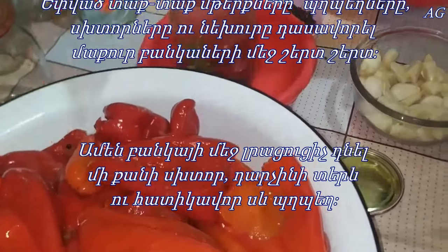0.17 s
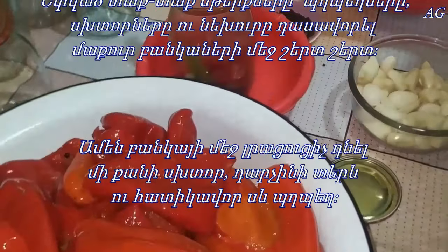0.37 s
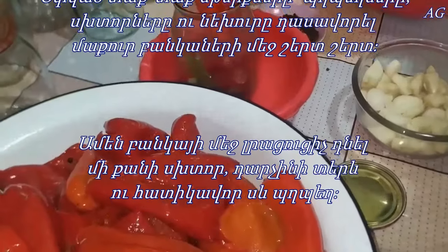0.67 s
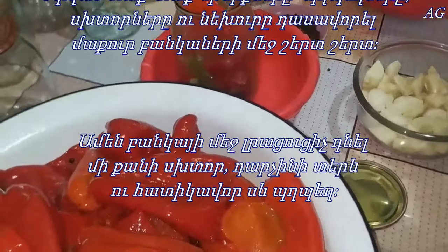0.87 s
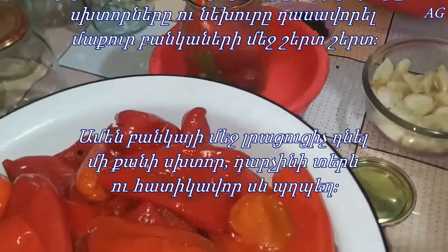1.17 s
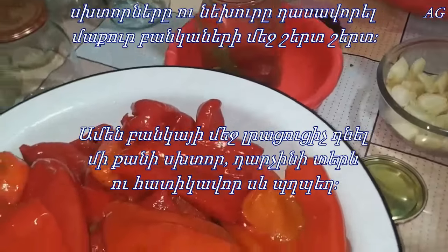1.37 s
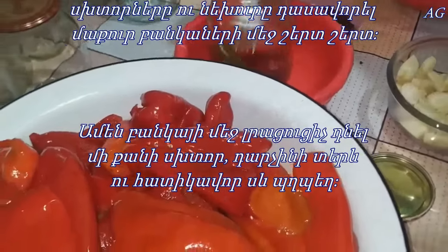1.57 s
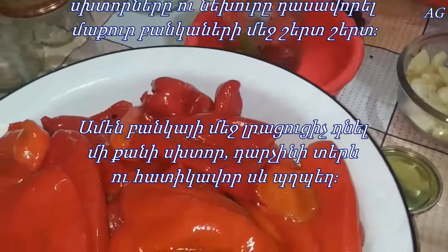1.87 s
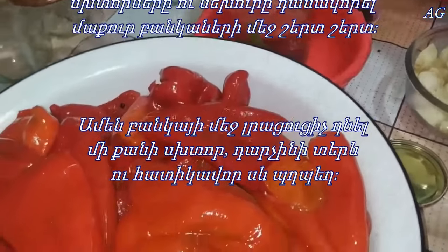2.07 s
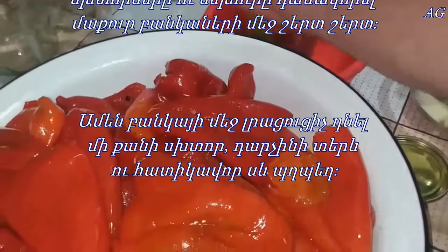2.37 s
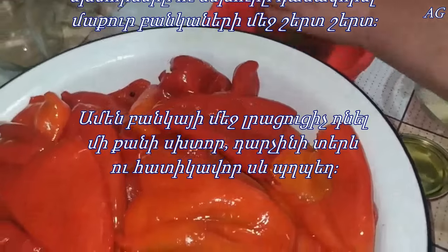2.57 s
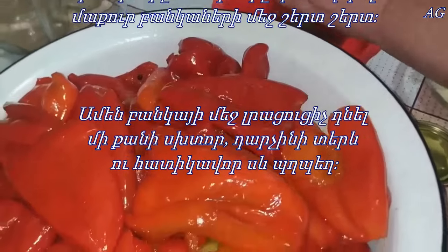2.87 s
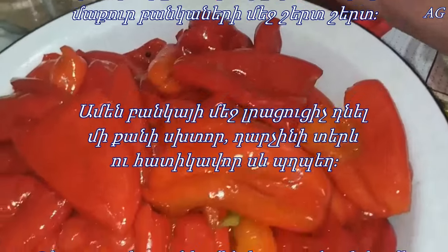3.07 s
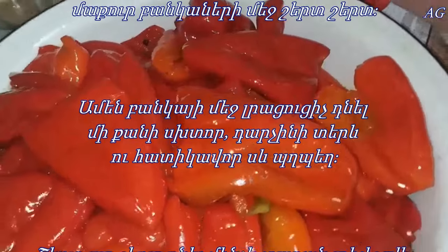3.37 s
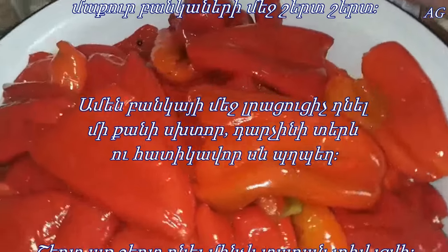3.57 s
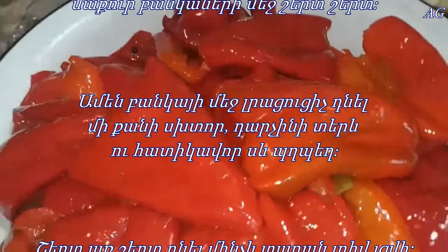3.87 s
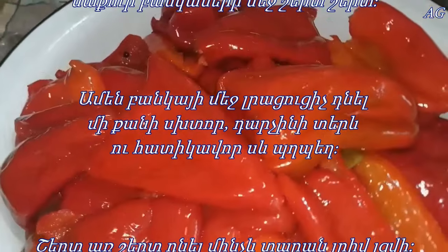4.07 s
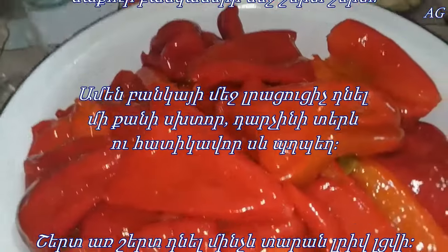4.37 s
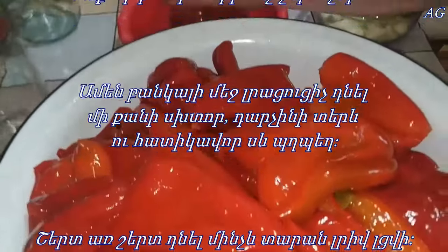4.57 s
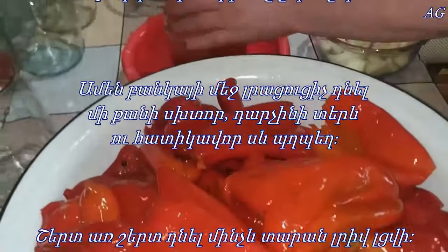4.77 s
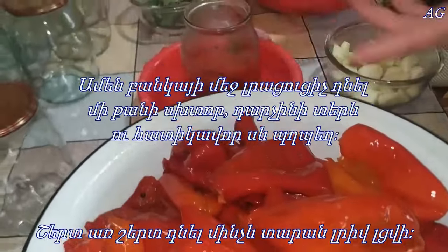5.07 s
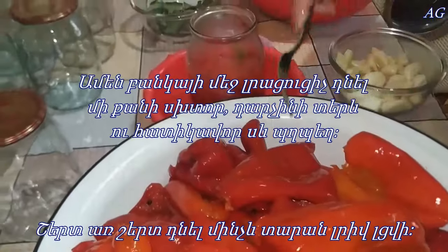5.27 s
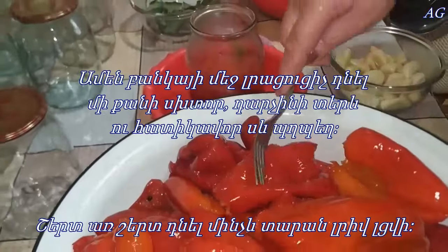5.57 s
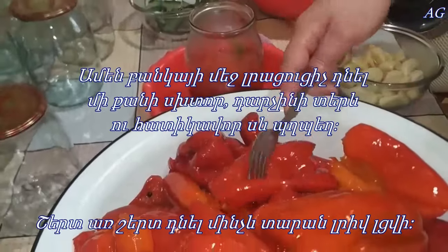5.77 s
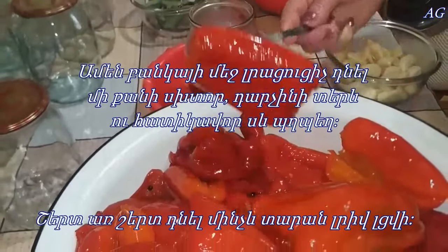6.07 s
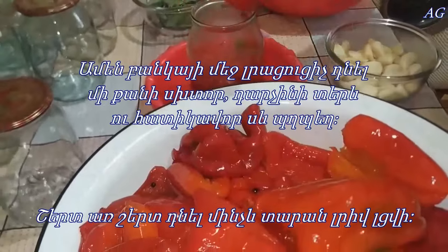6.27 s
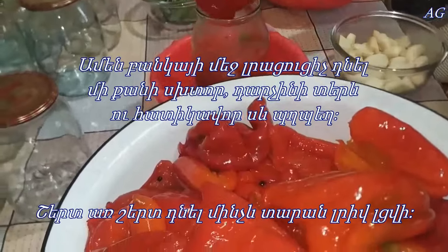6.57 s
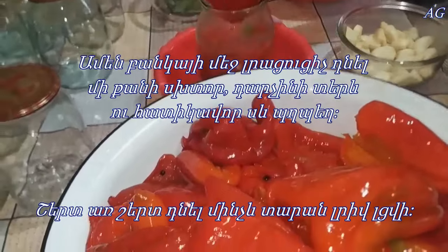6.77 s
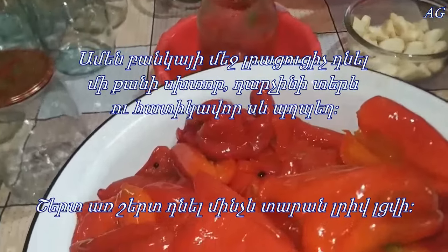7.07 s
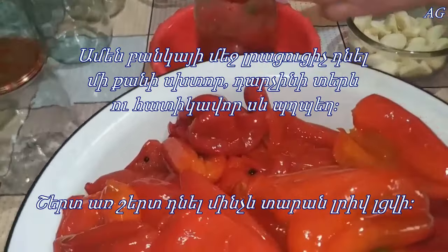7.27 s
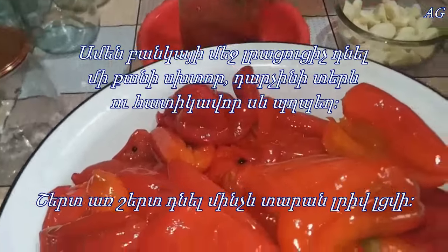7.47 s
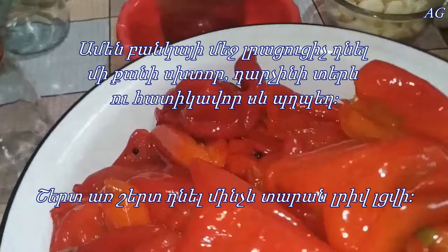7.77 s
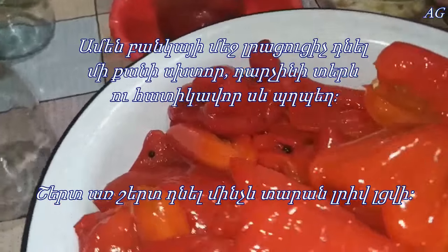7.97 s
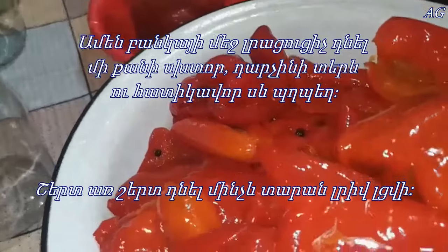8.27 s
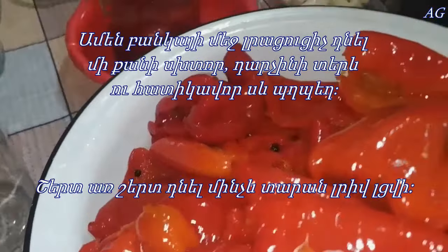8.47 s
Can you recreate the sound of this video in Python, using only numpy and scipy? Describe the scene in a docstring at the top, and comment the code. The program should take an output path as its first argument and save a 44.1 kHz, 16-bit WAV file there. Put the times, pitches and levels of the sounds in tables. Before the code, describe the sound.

Glassware clinks brightly at close range while wet food is nudged and hands rustle, over a faint low rumble and hum in a small kitchen.

```python
"""A faint low rumble and hum come first, with hands and sleeves rustling over them as filtered noise.
Then wet food is nudged about in dull puffs of noise, and glassware clinks eleven times, close by:
red peppers and garlic are being packed into a glass jar on a kitchen table.
Each clink is a sum of glass modes damped by the load, plus a noise crack, ringing on in a small room."""
import sys
import numpy as np
from scipy import signal
from scipy.fft import rfft, irfft
from scipy.io import wavfile
from scipy.ndimage import uniform_filter1d

SR = 44100
rng = np.random.default_rng(int(sys.argv[2]) if len(sys.argv) > 2 else 0)


def generate_wav(signal):
    """Clip the signal to [-1, 1] and save it as 16-bit WAV at the path in sys.argv[1]."""
    frames = np.transpose(np.atleast_2d(signal))
    scaled = np.clip(frames, -1, 1) * 32767
    pcm = np.round(scaled).astype(np.int16)
    wavfile.write(sys.argv[1], SR, pcm)


N = 381024  # length in samples


def gain_of(db):
    """Decibels to gain."""
    return 10 ** (np.asarray(db) / 20)


def evened(x):
    """Scales to rms 1."""
    return x / np.sqrt(np.mean(x ** 2) + 1e-20)


def read(points, hz):
    """Reads a curve on a log-frequency axis."""
    f, value = np.transpose(points)
    return np.interp(np.log(hz + 1), np.log(f + 1), value)


def follow(rows):
    """Draws every column of a timed table as a curve with a value at each sample."""
    s, *columns = np.transpose(rows)
    t = np.arange(N) / SR
    return [np.interp(t, s, column) for column in columns]


def smoothed_noise(first, second):
    """Random drift at rms 1: noise averaged twice, over these numbers of samples."""
    drift = uniform_filter1d(rng.standard_normal(N), first)
    return evened(uniform_filter1d(drift, second))


def add(mix, s, sound):
    """Mixes a stereo sound in at s seconds, cut off at the end of the mix."""
    start = max(round(s * SR), 0)
    part = mix[:, start:][:, :sound.shape[1]]
    part += sound[:, :part.shape[1]]


def panned(db):
    """Left and right gains for a left-over-right level difference, at constant power."""
    left, right = gain_of(db / 2), gain_of(-db / 2)
    return np.sqrt(2) * np.array([[left], [right]]) / np.hypot(left, right)


def coloured(x, spectrum):
    """Filters x with a spectrum, then scales it to rms 1."""
    size = x.shape[-1]
    hz = np.fft.rfftfreq(size, 1 / SR)
    return evened(irfft(rfft(x) * gain_of(read(spectrum, hz)), size))


def stereo_noise(size, shared):
    """Noise at two microphones; shared is the part of its power common to both."""
    z = rng.standard_normal((3, size))
    return np.sqrt(shared) * z[0] + np.sqrt(1 - shared) * z[1:]


def patchy(x, depth_db, frames, bins, size=512):
    """Lets patches of time and pitch swell and fade, by smoothed random gains on the spectrogram."""
    z = signal.stft(x, nperseg=size)[2]
    patches = uniform_filter1d(rng.standard_normal(z.shape[1:]), frames, axis=1)
    patches = evened(uniform_filter1d(patches, bins, axis=0))
    return signal.istft(z * gain_of(depth_db * patches), nperseg=size)[1][:, :N]


# Rumble of the room and the held camera, before the rumble trim: t/s, level/dB
RUMBLE_LEVEL = [(0, -62.5), (.7, -66), (.83, -57.5), (1.05, -62.5), (1.45, -55.5), (1.9, -61), (3.3, -57),
                (4.8, -59.5), (5.7, -61.5), (6.2, -59), (6.8, -61.5), (8.64, -58)]
# Tone colour of the rumble: f/Hz, relative level/dB
RUMBLE_COLOUR = [(10, -3.5), (30, 1.5), (60, -4), (110, -5), (160, -11.5), (240, -22), (400, -26),
                 (800, -37.5)]


def rumble(trim_db=3.5, lumps_db=2.5, sway_db=0.95):
    """Low filtered noise, lumpy in time and pitch, whose level also sways at random."""
    lumpy = patchy(stereo_noise(N, .03), lumps_db, 4, 2, size=4096)
    level_db = follow(RUMBLE_LEVEL)[0] + trim_db + sway_db * smoothed_noise(3000, 3000)
    return gain_of(level_db) * coloured(lumpy, RUMBLE_COLOUR)


# Partials of the steady hum: f/Hz, rms level/dB
HUM_PARTIALS = [(100, -67), (200, -87.5), (292, -83.5)]


def hum():
    """Steady sines, a quarter cycle apart between left and right."""
    t = np.arange(N) / SR
    side_cycles = np.array([[0], [.25]])
    out = np.zeros((2, N))
    for hz, db in HUM_PARTIALS:
        cycles = hz * t + rng.random() + side_cycles
        out += gain_of(db) * np.sqrt(2) * np.sin(2 * np.pi * cycles)
    return out


# A low drone that swells briefly: t/s, f/Hz, rms level of the fundamental/dB
DRONE_PATH = [(1.2, 131.5, -79), (1.31, 137.2, -60), (1.42, 136.6, -56.5), (1.5, 138.3, -62),
              (1.56, 149.8, -62), (1.64, 152, -57), (1.72, 141.6, -78)]


def drone(overtone_db=-17):
    """A gliding sine with a fainter octave above it, silent outside its path."""
    t = np.arange(N) / SR
    hz, db = follow(DRONE_PATH)
    phase = 2 * np.pi * np.cumsum(hz) / SR
    tone = np.sin(phase) + gain_of(overtone_db) * np.sin(2 * phase)
    sounding = (t > DRONE_PATH[0][0]) * (t < DRONE_PATH[-1][0])
    return np.sqrt(2) * gain_of(db) * tone * sounding


def background(side_db=-1.0):
    """Rumble, hum and drone add up as one bed, leaning slightly to the right."""
    return panned(side_db) * (rumble() + hum() + drone())


# Faint rustle that goes on between the strokes, before trims: t/s, level/dB
RUSTLE_LEVEL = [(0, -89), (1.03, -80), (1.2, -72.5), (2.4, -66), (3.4, -67.5), (4.8, -67), (5.45, -83),
                (5.7, -68), (6.6, -70), (7.3, -69.5), (8.64, -68.5)]
# Strokes of hand and sleeve, before trims:
# middle t/s, length t/s, dull body level/dB, bright friction level/dB
STROKES = [(.03, 0.11, -68, -73), (.37, 0.44, -73, -76), (0.623, 0.095, -65, -69.5), (0.887, .16, -64, -69),
           (1.34, 0.9, -68.5, -89), (1.67, 0.1, -57, -50.5), (1.836, 0.058, -78, -64),
           (2.436, 0.062, -51.5, -70), (2.525, 0.18, -51, -44), (2.752, 0.096, -50, -48.5),
           (2.972, 0.29, -63.5, -58), (3.068, 0.037, -43.5, -59), (3.18, 0.19, -48, -49),
           (3.473, 0.072, -50.5, -54.5), (3.553, 0.16, -57.5, -58), (3.76, 0.17, -53, -52),
           (3.887, 0.18, -48, -50.5), (4.068, .12, -48, -53), (4.333, 0.22, -51, -58.5),
           (4.453, 0.12, -66, -50.5), (4.653, 0.14, -56, -54), (5.02, 0.18, -80, -64),
           (5.265, .12, -65.5, -71), (5.445, .05, -65, -69), (5.582, 0.086, -64, -66),
           (5.802, 0.034, -65, -66), (5.96, 0.064, -69, -64), (6.419, 0.043, -65, -62),
           (6.741, 0.19, -63.5, -58.5), (6.94, 0.12, -62.5, -55.5), (7.17, 0.06, -75.5, -64),
           (7.385, .18, -58.5, -52.5), (7.489, 0.085, -59, -53.5), (7.786, 0.098, -60.5, -60),
           (7.9, 0.16, -65.5, -59.5), (8.06, 0.19, -64, -50.5), (8.284, 0.18, -63.5, -53.5)]
# Tone colour of the dull body: f/Hz, relative level/dB
BODY_COLOUR = [(90, -14), (200, 4), (400, 0), (700, -4), (1050, -1), (1600, -8.5), (3000, -15), (6000, -27)]
# Tone colour of the bright friction: f/Hz, relative level/dB
FRICTION_COLOUR = [(600, -22.5), (1500, -0.5), (2200, 1.5), (2900, -1), (3700, 1.5), (6000, -1), (7500, -3),
                   (9000, -5), (13000, -11), (15500, -15)]


def rubbing(trim_db=-3.5, catch_db=2.03, rustle_body_db=-0.5, edge_db=8.5, fidget_db=1.0):
    """Skin and cloth slide in tiny catches: a lumpy dull body under a smoother bright hiss."""
    t = np.arange(N) / SR
    rustle_db = follow(RUSTLE_LEVEL)[0] + fidget_db * smoothed_noise(2500, 2500)
    body_gain = gain_of(rustle_db + rustle_body_db)
    friction_gain = gain_of(rustle_db)
    for middle_s, length_s, dull_db, bright_db in STROKES:
        # the hand speeds up and slows down: half a length from its middle a stroke is edge_db down
        half_lengths = np.minimum(abs(t - middle_s) / (length_s / 2), 10)
        bell = gain_of(-edge_db * half_lengths ** 2)
        # strokes and rustle add in power
        body_gain = np.hypot(body_gain, gain_of(dull_db) * bell)
        friction_gain = np.hypot(friction_gain, gain_of(bright_db) * bell)
    catches = smoothed_noise(600, 300)
    dull = patchy(stereo_noise(N, .08), 3.2, 7, 3)
    bright = patchy(stereo_noise(N, .1), 2.0, 7, 8)
    dull = coloured(dull * gain_of(catch_db * catches), BODY_COLOUR)
    # the hiss follows the catches only slightly
    bright = coloured(bright * gain_of(0.18 * catch_db * catches), FRICTION_COLOUR)
    return gain_of(trim_db) * (body_gain * dull + friction_gain * bright)


# Soft touches of food and fork, levels before the envelope:
# t/s, level/dB, centre f/Hz, width/octaves, decay t/s
TOUCHES = [(.60, -69, 1050, 0.58, 0.031), (2.418, -48.5, 310, 0.71, 0.021),
           (2.501, -49.5, 980, 0.18, 0.041), (3.059, -50.5, 840, 0.68, 0.0086),
           (3.706, -55.5, 1290, 0.69, 0.032), (3.86, -47, 972, 0.98, 0.016), (3.995, -45, 816, 1, 0.0079),
           (4.41, -54, 1100, 1, 0.019), (5.564, -70, 1500, 0.86, 0.022), (5.667, -50.5, 7290, 0.76, 0.0064),
           (5.7, -59.5, 4560, 0.37, 0.012), (5.92, -68.5, 3830, 0.15, 0.022),
           (5.972, -64, 3800, 0.067, 0.021), (6.28, -59, 2320, 0.25, 0.01),
           (6.408, -64.5, 3200, 0.24, 0.031), (6.52, -66.5, 2500, 0.31, 0.035),
           (6.731, -62, 1320, 0.33, 0.037), (7.372, -49, 1420, 0.54, 0.012)]


def touches(rise_s=0.0023, tail_db=-13, tail_s=.06, size=12000):
    """Soft food gives dull puffs of noise without ring; the room holds each for a moment."""
    out = np.zeros((2, N))
    t = np.arange(size) / SR
    for s, db, hz, octaves, decay_s in TOUCHES:
        # a hill of noise around the centre, 4 dB down one width away
        hill = [(hz * 2 ** (k * octaves), -4 * k * k) for k in range(-3, 4)]
        fall = np.exp(-t / decay_s) + gain_of(tail_db) * np.exp(-t / tail_s)
        envelope = (1 - np.exp(-t / rise_s)) * fall
        puff = coloured(stereo_noise(size, 0.35), hill)
        add(out, s, gain_of(db) * envelope * puff)
    return out


# Ring time of the room, the time to fall 60 dB: f/Hz, t60/s
ROOM_T60 = [(300, .4), (900, .36), (2100, .28), (5500, .255), (9000, .235), (15000, .2)]


def kitchen(table_s=.0024, table_db=-1.5, early_db=1.0, early_s=.014, tail_db=0.5, size=20000):
    """Direct sound, a bounce off the table, scatter from nearby dishes and the tail of the room."""
    t = np.arange(size) / SR
    hz, frame_s, z = signal.stft(rng.standard_normal((2, size)), SR, nperseg=256)
    fade_db = -60 * frame_s / read(ROOM_T60, hz)[:, None]
    tail = signal.istft(z * gain_of(fade_db), SR, nperseg=256)[1][:, :size]
    tail *= np.clip((t - .005) / 0.0071, 0, 1)  # fades in from 5 ms
    sparse = rng.random((2, size)) < .05
    early = rng.standard_normal((2, size)) * sparse * np.exp(-t / early_s) * (t > .001)
    response = gain_of(tail_db) * evened(tail) + gain_of(early_db) * evened(early)
    response /= np.sqrt(size)
    response[:, 0] += 1  # direct sound
    # the bounce reaches each side at its own time
    bounce = np.round(table_s * SR * rng.uniform(.8, 1.2, 2)).astype(int)
    response[[0, 1], bounce] += gain_of(table_db)
    return response


# Borders between the families of glass modes; where a blow lands sets how strongly each sounds: f/Hz
FAMILY_EDGES = [200, 1500, 2900, 4600, 5900, 7600, 15800]
# Balance, one row a family, low to high:
# level trim/dB, contact crack level/dB before doubling, left-right level/dB
FAMILY_BALANCE = [(-1, 0, 1), (1.5, -17.5, 1.5), (-0.5, -9.5, -1), (-1.5, -11.5, 0), (-0.5, -11.5, -3.5),
                  (-2.5, -13, 2)]
# Modes of the glass, before random variation and each clink's factors: f/Hz, level/dB, t60/s
GLASS_MODES = [(1890, -11, .02), (2030, -4, .03), (2116, 0, .06), (2400, -24, .02), (2640, -25, .02),
               (3080, -17, .015), (3565, -10, .04), (4090, -11, .04), (4900, -19, .025), (5240, -7, .03),
               (5340, -5, .04), (5415, -6, .045), (6410, -4, .03), (6530, 0, .045), (6680, -12, .02),
               (7080, -16, .015), (7500, -18, .02), (8135, -11, .035), (8360, -19, .04), (9520, -15, .03),
               (9820, -13, .018), (10310, -18, .05), (10790, -12, .02), (11490, -11, .035),
               (12280, -15, .03), (12580, -11, .045), (13740, -15, .045), (13920, -16, .04),
               (14140, -16, .02), (14860, -17, .02)]


def ringing(t, lo, hi, ring_time, pitch, vary_db=4.5):
    """Modes of one family ring as decaying sines, retuned and damped by the load."""
    ring = 0
    for hz, mode_db, t60 in GLASS_MODES:
        if lo <= hz < hi:
            if hz < FAMILY_EDGES[2]:
                hz = hz * pitch  # only the two lowest families follow the pitch factor
            hz = hz * (1 + .002 * rng.standard_normal())
            fade_db = mode_db + vary_db * rng.standard_normal() - 60 * t / (t60 * ring_time)
            cycles = hz * t + rng.random((2, 1))  # its own phase at each microphone
            ring = ring + gain_of(fade_db) * np.sin(2 * np.pi * cycles)
    return ring


def contact_crack(t, crack_s=0.007, echo=0.5):
    """Decaying noise, hollowed at 4.4, 8.8 and 13.2 kHz by a very close reflection."""
    crack = rng.standard_normal((2, t.size)) * np.exp(-t / crack_s)
    return crack - echo * np.pad(crack, ((0, 0), (10, 0)))[:, :t.size]


def crack_band(crack, lo, hi, knock_hz=263):
    """The crack's share of one family; below the modes there is only a dull knock."""
    band = signal.sosfilt(signal.butter(2, [lo, hi], "band", fs=SR, output="sos"), crack)
    if lo < knock_hz:
        band = signal.sosfilt(signal.butter(1, knock_hz, fs=SR, output="sos"), band)
    return band


CONTACT_S, GRAZE_S = .001, .004  # build-up of the blow; lead of the light graze before it


def clink(levels, pan_db, ring_time, pitch, graze_db=-17, size=6000):
    """A light graze and then the blow ring the glass; the contact adds a short crack."""
    t = np.arange(size) / SR
    room, crack = kitchen(), contact_crack(t)
    loud = round(.08 * SR)  # a level is the rms of the first 80 ms
    build_up = (1 - np.exp(-t / CONTACT_S)) ** 2
    graze_samples = round(GRAZE_S * SR)
    out = 0
    families = zip(FAMILY_EDGES, FAMILY_EDGES[1:], levels, FAMILY_BALANCE)
    for lo, hi, db, (trim_db, crack_db, side_db) in families:
        ring = ringing(t, lo, hi, ring_time, pitch)
        blow = (ring + 2 * gain_of(crack_db) * crack_band(crack, lo, hi)) * build_up
        delayed = np.pad(blow, ((0, 0), (graze_samples, 0)))[:, :size]
        contact = gain_of(graze_db) * blow + delayed
        heard = signal.fftconvolve(contact, room, axes=1)
        heard /= heard[:, :loud].std(axis=1, keepdims=True)
        out = out + gain_of(db + trim_db) * panned(side_db + pan_db) * heard
    return out


# One row a clink: t/s, then level/dB of each of six families from low to high before the trim,
# left-right level/dB, ring time (factor), pitch of the two lowest families (factor)
CLINKS = [(0.745, -58, -47, -52.5, -48.5, -58, -55, 0.28, 1.35, 1.003),
          (1.403, -62, -62, -47.5, -60, -36, -42.5, 2.2, 1, 0.94),
          (1.976, -50, -25.5, -33, -24.5, -19, -27, -0.24, 0.65, 1.021),
          (2.247, -64.5, -52.5, -40.5, -51, -26.5, -35.5, 2, 1.03, 0.98),
          (2.573, -70, -45, -67, -53, -54.5, -54.5, -2, 0.26, 0.98),
          (3.219, -45, -22.5, -31, -29, -20, -28.5, 0.27, 0.97, 1.0),
          (3.508, -58.5, -39.5, -52.5, -38, -50.5, -48.5, 0.64, 0.49, 1.004),
          (4.184, -61.5, -40, -49, -52, -54, -52.5, 0.13, 0.52, 1.007),
          (4.661, -49.5, -30.5, -37.5, -34.5, -26, -35, 0.52, 0.51, 0.98),
          (7.663, -57.5, -46.5, -55.5, -48.5, -48, -49.5, 1, 0.37, 1.004),
          (8.154, -52, -33, -40.5, -25.5, -27.5, -35.5, -1.7, 0.49, 0.98)]


def glassware():
    """All the clinks, each begun early by the graze and the build-up of its blow."""
    out = np.zeros((2, N))
    for s, *levels, pan_db, ring_time, pitch in CLINKS:
        add(out, s - CONTACT_S - GRAZE_S, clink(levels, pan_db, ring_time, pitch))
    return out


def scene(hiss_db=-76.5):
    """Everything heard at the table, over the white hiss of the microphones."""
    hiss = gain_of(hiss_db) * rng.standard_normal((2, N))
    return hiss + background() + rubbing() + touches() + glassware()


def record(dry, ceiling=.9, top_hz=15900):
    """The camera rounds off the very tallest peaks and limits the treble."""
    rounded = dry / (1 + (dry / ceiling) ** 8) ** (1 / 8)
    lowpass = signal.firwin(255, top_hz, window=("kaiser", 8), fs=SR)
    return signal.oaconvolve(rounded, lowpass[None], "same")


dry = scene()
out = record(dry)
generate_wav(out)
```